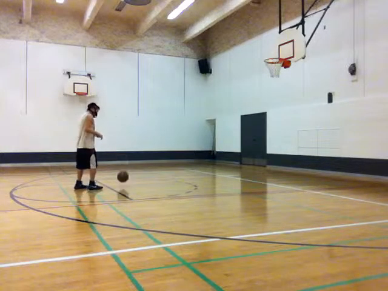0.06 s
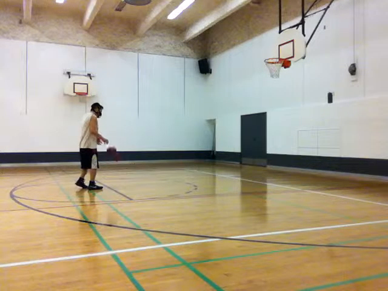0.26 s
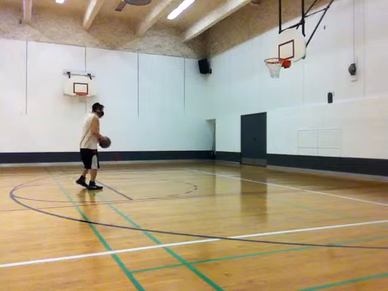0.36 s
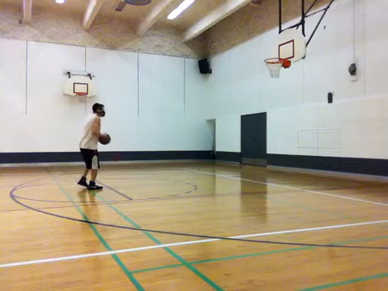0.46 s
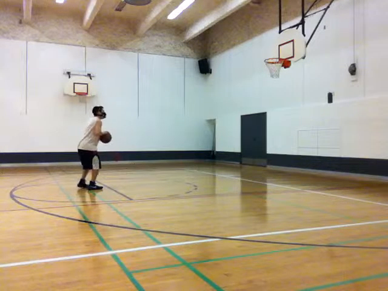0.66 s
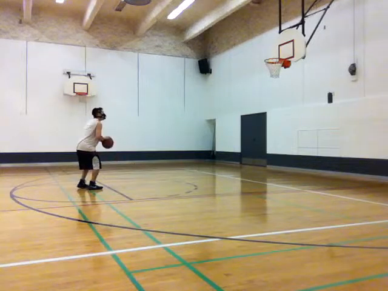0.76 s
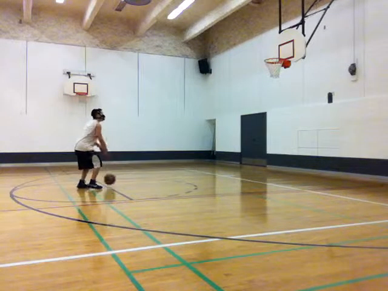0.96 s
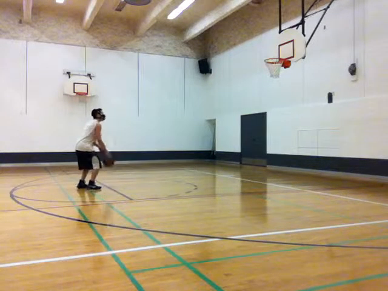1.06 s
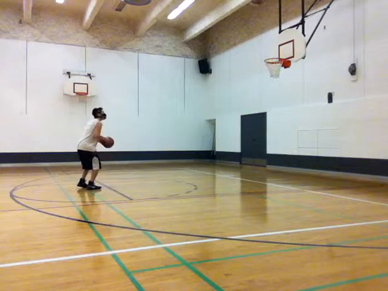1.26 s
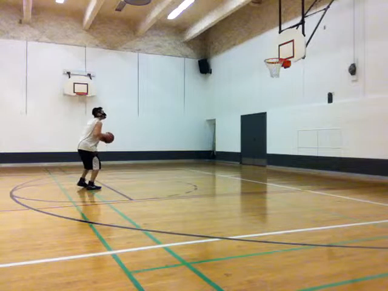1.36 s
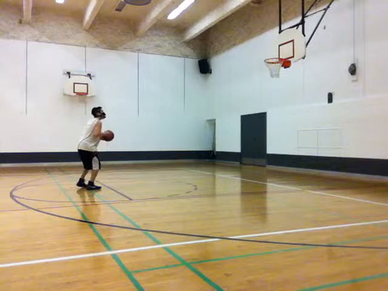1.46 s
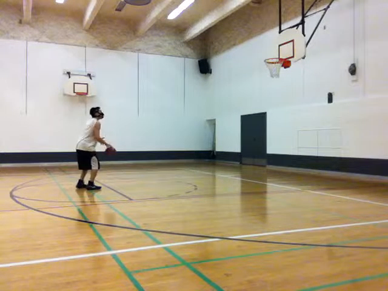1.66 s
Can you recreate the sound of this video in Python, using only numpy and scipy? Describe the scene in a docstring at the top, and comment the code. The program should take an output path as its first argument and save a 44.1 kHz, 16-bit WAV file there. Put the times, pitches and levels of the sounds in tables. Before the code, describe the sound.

Two basketball bounces, slap and hollow thump, ring out with long boomy reverberation in an empty gym

```python
"""A faint room tone, with a wavering hum, and the dying reverberation of earlier play fill a large gym.
At 0.25 s a basketball strikes the wooden floor: excited skin slaps, floor modes thump, enclosed air pings.
Delayed copies form the wall echoes; noise with frequency-dependent decay forms the long, boomy reverberation.
A faint swell of hiss, probably the rustle of hands and clothes, is centred on 0.69 s.
At 1.11 s the ball strikes again, at another spot, lower in pitch and with a weaker boom."""
import sys
import numpy as np
from scipy import signal
from scipy.fft import rfft, irfft, next_fast_len
from scipy.io import wavfile
from scipy.ndimage import uniform_filter1d, map_coordinates

SR = 44100
rng = np.random.default_rng(int(sys.argv[2]) if len(sys.argv) > 2 else 0)


def int16_out(signal):
    """Quantize to a 16-bit WAV file."""
    q = np.round(np.clip(np.atleast_2d(signal).T, -1, 1) * 32767)
    wavfile.write(sys.argv[1], SR, q.astype(np.int16))


N = 74970

# Room tone spectrum: f/Hz, level/dB per Hz
ROOM_SPECTRUM = [(25, -104), (60, -72), (130, -77.5), (300, -78.5), (600, -83), (1300, -102), (3000, -102),
                 (7800, -112), (9000, -106), (10300, -112), (18000, -113)]
HUM_HZ, HUM_WOBBLE_KNOTS_PER_S, HUM_DB = 208, 5.56, -49
# Reverberation of earlier play: f/Hz, starting level/dB per Hz
LINGERING_SPECTRUM = [(60, -98), (200, -66), (330, -112), (600, -87), (1400, -104), (1900, -93),
                      (2300, -102), (2900, -91), (3600, -104), (7000, -112), (9000, -101), (10500, -113),
                      (18000, -120)]
LINGERING_T60_S = 1.6
# Rustle spectrum, before its gain and swell: f/Hz, level/dB per Hz
RUSTLE_SPECTRUM = [(500, -125), (4000, -102), (7700, -101), (10000, -108), (12500, -105), (16000, -111)]
RUSTLE_CENTRE_S, RUSTLE_WIDTH_S, RUSTLE_GAIN_DB = 0.69, 0.29, 1

# Reverberation spectrum, before the boom of each bounce: f/Hz, starting level/dB per Hz
HALL_SPECTRUM = [(30, -87.5), (60, -74.5), (90, -58), (120, -50.5), (180, -43.5), (250, -42), (340, -48.5),
                 (480, -52), (700, -56.5), (900, -67), (1080, -67), (1230, -69.5), (1550, -66),
                 (1950, -75.5), (2800, -78), (3500, -79), (4700, -77.5), (7000, -83), (10000, -97),
                 (14000, -97), (19000, -112)]
# Reverberation time: f/Hz, t60/s
HALL_DECAY = [(60, 3.56), (120, 2.27), (220, 2.73), (400, 1.87), (1000, 2.7), (2500, 3.37), (4300, 2.73),
              (5500, 1.32), (8000, 1.19), (14000, 0.45)]
# Response of the reverberation to boom: f/Hz, share of the boom level/1
BOOM_RESPONSE = [(60, 0.4), (130, 0), (260, 0.61), (420, 0.51), (700, 0.63), (1000, -0.5), (1400, 0.9),
                 (2700, 0), (5000, 0.35), (10000, -0.62)]
HALL_BUILD_S, PING_WET_DB = 0.0014, -1.5
# Grain: level fluctuation above a limit, itself dying away with a time constant
GRAIN_ABOVE_HZ, HALL_GRAIN_DB, HALL_GRAIN_S = 1000, 4, 0.38
# Below that limit: smoothing time of the power, share of the swells removed
HALL_STEADY_S, HALL_STEADINESS = 0.056, 0.54
# Standing waves, before pitch ratio and boom: f/Hz, peak level/dB, time to peak t/s
ROOM_MODES = [(279.7, -16.5, 0.026), (247.4, -21.5, 0.085), (211, -22.5, 0.23)]
WAVE_WANDER_RAD, WAVE_WANDER_KNOTS_PER_S = 0.61, 13.6
WAVE_GROWTH = 1.46  # dB of standing wave for each dB of boom

# Colour of the small echoes: f/Hz, level/dB
SMALL_ECHO_FILTER = [(1000, -4.5), (4000, 3.5), (6000, -5), (9000, -21), (14000, -24)]
SMALL_ECHOES_PER_S, SMALL_ECHO_DB, SMALL_ECHO_T60_S = 58, -26.5, 3.7
# Colour of the near scatter: f/Hz, level/dB
SIZZLE_FILTER = [(1000, 9), (2200, -17), (4200, 6.5), (7000, -9.5), (12000, 1)]
SIZZLE_DB, SIZZLE_T60_S, SIZZLE_DELAY_S = -1, 0.021, 0.0031
# Later wall echoes: delay t/s, slap level/dB, thump level/dB
LATER_ECHOES = [(0.041, -26, -8), (.055, -8.5, -13), (0.06, -6, -10), (0.067, -10.5, -36),
                (.102, -25, -11.5), (.108, -13, -48), (.129, -23, -9.5), (.172, -22, -18.5),
                (.205, -13, -30), (0.21, -17.5, -13.5), (.239, -16, -30), (0.26, -34, -23),
                (0.27, -16, -19)]
# Reflection from the later walls: f/Hz, level/dB
WALL_FILTER = [(500, 4), (2000, -11), (3000, -3), (4500, 3), (6000, -7), (10000, -0.5), (16000, -16)]
# Reflection from the first wall: f/Hz, level/dB
FIRST_WALL_FILTER = [(500, 3), (2000, -14.5), (3600, 4.5), (5000, -10), (7000, 8.5), (8200, -3), (12000, 9),
                     (16000, 0)]
FIRST_WALL_SLAP_DB, FIRST_WALL_THUMP_DB, FIRST_WALL_THUMP_CUT_HZ = -4.5, -0.5, 155
ECHO_SMEAR_T60_S = 0.009
AIR_LOSS_DB_PER_S = 84  # at 10 kHz, growing as frequency squared
SCATTER_EVENNESS = 0.32  # share of a burst's chance colour that is flattened

# Modes of the air inside the ball, before the gain of each bounce: f/Hz, level/dB, t60/s
AIR_MODES = [(478.6, -33.5, 0.72), (849.5, -39, 0.26), (986, -43, 0.17), (1062, -37, 0.29),
             (1374, -36.5, 0.076), (1517, -37.5, 0.11), (1720, -55, 0.39), (1947, -41, 0.12),
             (2686, -33.5, 0.03), (2895, -49, 0.26), (3684, -36, 0.037)]
# Modes of ball and boards, before pitch ratio and gain:
# f/Hz, level at the first spot/dB, level at the second spot/dB, t60/s
FLOOR_MODES = [(127.5, -6.5, -12.5, 0.077), (197, 1.5, -5, 0.018), (287, 0, -8, 0.016),
               (388.4, -17.5, -19, 0.051), (484, -14.5, -22, 0.081), (601, -15.5, -19.5, 0.054),
               (799, -23, -28.5, 0.11), (948, -35, -31.5, 0.047), (1132, -25, -17.5, 0.019)]
MODE_RISE_CYCLES, THUMP_LOW_CUT_HZ = 0.17, 121
# Spectrum of the skin slap, before smack and gain: f/Hz, level/dB
SLAP_SPECTRUM = [(30, -41), (150, 1), (400, -6.5), (1000, 5.5), (1270, -3), (1650, 16), (2900, 10.5),
                 (3500, -2), (7000, 0.5), (9500, -5.5), (12000, -15), (18000, -19)]
# Response of the slap to smack: f/Hz, share of the smack level/1
SMACK_RESPONSE = [(700, -5.5), (1200, 3.7), (2300, 2.4), (3300, 0.5)]
# Pebbled skin flattening
CONTACT_DB, CONTACT_T60_S, CONTACT_LOW_CUT_HZ = -2.5, 0.004, 4730
# Bounces: t/s, slap level/dB, smack level/dB, thump level/dB, thump pitch ratio/1,
# ping level/dB, hall boom level/dB, delay of the first wall echo t/s
STRIKES = [(0.2467, 1, -1.5, -3.5, 0.99, -0.5, -2.5, .0261), (1.1130, 2, -1.5, 0, 0.91, 0.5, -10, .0272)]
TOP_HZ = 19000


def amp(db):
    """A level in decibels is twenty times the logarithm of the gain."""
    return 10 ** (np.asarray(db) / 20)


def along(points, hz):
    """Values are interpolated on a logarithmic frequency axis."""
    f, v = np.transpose(points)
    return np.interp(np.log(hz + 1), np.log(f + 1), v)


def fade(t, t60):
    """Exponential decay falls to a thousandth of its amplitude at t60."""
    return np.exp(-np.log(1000) * t / t60)


def wobble(rate):
    """Spline interpolation of random knots, rate per second, gives a smooth fluctuation."""
    return map_coordinates(rng.standard_normal(N), [np.arange(N) * rate / SR], order=3)


def coloured(x, curve):
    """Minimum-phase filtering: the folded cepstrum makes the gain curve(Hz) in dB causal."""
    m = 2 * next_fast_len(N)
    gain = amp(curve(np.fft.rfftfreq(m, 1 / SR)))
    cepstrum = irfft(np.log(gain), m)
    cepstrum[1:m // 2] *= 2
    cepstrum[m // 2 + 1:] = 0
    response = np.exp(rfft(cepstrum))
    return irfft(rfft(x, m) * response, m)[:N]


def white():
    """White noise has equal power in every hertz, here 0 dB per Hz."""
    return rng.standard_normal(N) * np.sqrt(SR / 2)


def convolved(a, b):
    """Linear superposition: a is played through the impulse response b."""
    return signal.fftconvolve(a, b)[:N]


def delayed(x, s):
    """Propagation delay: x starts s seconds later."""
    return np.pad(x, (max(round(s * SR), 0), 0))[:N]


def low_cut(x, hz):
    """A third-order high-pass filter attenuates what lies below hz."""
    return signal.sosfilt(signal.butter(3, hz, "highpass", fs=SR, output="sos"), x)


def scatter(t60):
    """Diffuse scattering: a decaying noise burst of unit energy and partly evened spectrum."""
    spectrum = rfft(rng.standard_normal(N) * fade(np.arange(N) / SR, t60))
    evening = (np.abs(spectrum) + 1e-9) ** np.clip(SCATTER_EVENNESS, 0, 1)
    burst = irfft(spectrum / evening, N)
    burst[N // 2:] = 0  # drop the part wrapped round from before the onset
    return burst / np.linalg.norm(burst)


def ring(modes, pitch=1):
    """Modal superposition: damped modes start together, alternating in sign; low ones rise more slowly."""
    t = np.arange(N) / SR
    total = np.zeros(N)
    for k, (hz, db, t60) in enumerate(modes):
        rise = 1 - np.exp(-t * hz / MODE_RISE_CYCLES)
        envelope = amp(db) * fade(t, t60) * rise
        total += (-1) ** k * envelope * np.sin(2 * np.pi * hz * pitch * t)
    return total


def room_tone():
    """Stationary noise gives rumble and hiss; a tone of random amplitude and phase gives the hum."""
    phase = 2 * np.pi * HUM_HZ * np.arange(N) / SR
    hum = wobble(HUM_WOBBLE_KNOTS_PER_S) * np.sin(phase)
    hum += wobble(HUM_WOBBLE_KNOTS_PER_S) * np.cos(phase)
    return coloured(white(), lambda hz: along(ROOM_SPECTRUM, hz)) + amp(HUM_DB) * hum


def lingering():
    """Reverberant decay: sound of earlier play dies away exponentially."""
    noise = coloured(white(), lambda hz: along(LINGERING_SPECTRUM, hz))
    return noise * fade(np.arange(N) / SR, LINGERING_T60_S)


def rustle():
    """Friction noise, probably of hands and clothes: hiss under a Gaussian swell."""
    t = np.arange(N) / SR
    swell = np.exp(-((t - RUSTLE_CENTRE_S) / RUSTLE_WIDTH_S) ** 2)
    hiss = coloured(white(), lambda hz: along(RUSTLE_SPECTRUM, hz))
    return amp(RUSTLE_GAIN_DB) * swell * hiss


def diffuse_noise():
    """Dense reflections behave as noise: steadied below the grain limit, grainy above it at first."""
    spectrum, hz = rfft(white()), np.fft.rfftfreq(N, 1 / SR)
    grain_fade = np.exp(-np.arange(N) / SR / HALL_GRAIN_S)
    grain = amp(HALL_GRAIN_DB * grain_fade * wobble(250))
    out = grain * irfft(spectrum * (hz >= GRAIN_ABOVE_HZ), N)
    window = max(round(HALL_STEADY_S * SR), 1)
    for lo, hi in [(0, 150), (150, 310), (310, GRAIN_ABOVE_HZ)]:
        band = irfft(spectrum * (hz >= lo) * (hz < hi), N)
        power = np.abs(uniform_filter1d(np.abs(signal.hilbert(band)) ** 2, window))
        out += band * (power.mean() / power) ** (np.clip(HALL_STEADINESS, 0, 1) / 2)
    return out


def hall_tail():
    """Reverberation builds up quickly, then each frequency decays with its own t60."""
    hz, s, z = signal.stft(diffuse_noise(), SR, nperseg=512)
    decayed = z * fade(s, along(HALL_DECAY, hz)[:, None])
    tail = signal.istft(decayed, SR, nperseg=512)[1][:N]
    return tail * (1 - np.exp(-np.arange(N) / SR / HALL_BUILD_S))


def standing_waves(pitch):
    """Room resonance: modes near the thump's pitch peak in turn, the lower later, so the boom sinks."""
    t = np.arange(N) / SR
    total = np.zeros(N)
    for hz, db, peak_s in ROOM_MODES:
        swell = (t / peak_s * np.exp(1 - t / peak_s)) ** 2
        wander = WAVE_WANDER_RAD * wobble(WAVE_WANDER_KNOTS_PER_S)
        total += amp(db) * swell * np.sin(2 * np.pi * hz * pitch * t + wander)
    return total


def small_echoes(slap):
    """Reflection from beams and backboards: random arrivals, fading in level, repeat the slap weakly."""
    t = np.arange(N) / SR
    arrivals = (rng.random(N) < SMALL_ECHOES_PER_S / SR) * rng.standard_normal(N)
    paths = amp(SMALL_ECHO_DB) * arrivals * fade(t, SMALL_ECHO_T60_S)
    return convolved(slap, coloured(paths, lambda hz: along(SMALL_ECHO_FILTER, hz)))


def sizzle(slap):
    """Scattering off the nearby floor and the player smears the slap just after the strike."""
    burst = delayed(scatter(SIZZLE_T60_S), SIZZLE_DELAY_S)
    spread = coloured(burst, lambda hz: along(SIZZLE_FILTER, hz))
    return amp(SIZZLE_DB) * convolved(slap, spread)


def wall_echo(slap, thump, colour, delay, slap_db, thump_db):
    """Reflection and air absorption: the thump and a smeared slap return, duller after a longer path."""
    def reflection(hz):
        """Wall colour less air absorption, in dB."""
        return along(colour, hz) - AIR_LOSS_DB_PER_S * delay * (hz / 10 ** 4) ** 2
    wall = coloured(scatter(ECHO_SMEAR_T60_S), reflection)
    return delayed(amp(slap_db) * convolved(slap, wall) + amp(thump_db) * thump, delay)


def wall_echoes(slap, thump, first_delay):
    """Superposition of reflections: every wall answers once, and the first swallows the bass."""
    first_thump = low_cut(thump, FIRST_WALL_THUMP_CUT_HZ)
    echoes = wall_echo(slap, first_thump, FIRST_WALL_FILTER, first_delay,
                       FIRST_WALL_SLAP_DB, FIRST_WALL_THUMP_DB)
    for delay, slap_db, thump_db in LATER_ECHOES:
        echoes = echoes + wall_echo(slap, thump, WALL_FILTER, delay, slap_db, thump_db)
    return echoes


def air_ping():
    """Cavity resonance: the air inside the ball rings in damped modes."""
    return ring(AIR_MODES)


def floor_thump(spot, pitch):
    """Modal excitation depends on the spot struck; ball and boards radiate little deep bass."""
    modes = [(hz, levels[spot], t60) for hz, *levels, t60 in FLOOR_MODES]
    return low_cut(ring(modes, pitch), THUMP_LOW_CUT_HZ)


def skin_slap(smack_db):
    """Impact excitation: an impulse and pebbly treble, fuller in the upper middle for a higher smack level."""
    pebbles = delayed(scatter(CONTACT_T60_S), CONTACT_T60_S / 20)
    click = amp(CONTACT_DB) * low_cut(pebbles, CONTACT_LOW_CUT_HZ)
    click[0] -= 1
    return coloured(click, lambda hz: along(SLAP_SPECTRUM, hz) + smack_db * along(SMACK_RESPONSE, hz))


def bounce(spot, slap_db, smack_db, thump_db, pitch, ping_db, boom_db, first_delay):
    """Direct sound, reflections and reverberation superpose; the boom level sets the hall's response."""
    slap = amp(slap_db) * skin_slap(smack_db)
    thump = amp(thump_db) * floor_thump(spot, pitch)
    ping = amp(ping_db) * air_ping()
    echoes = sizzle(slap) + wall_echoes(slap, thump, first_delay) + small_echoes(slap)
    reverb = coloured(hall_tail(), lambda hz: along(HALL_SPECTRUM, hz) + boom_db * along(BOOM_RESPONSE, hz))
    tail = hall_tail()
    ping_reverb = amp(PING_WET_DB) * convolved(ping, tail / np.linalg.norm(tail))
    waves = amp(WAVE_GROWTH * boom_db) * standing_waves(pitch)
    return slap + thump + ping + echoes + reverb + ping_reverb + waves


def scene():
    """Linear superposition of the background and the two bounces, in one channel."""
    mix = room_tone() + lingering() + rustle()
    for spot, (start_s, *settings) in enumerate(STRIKES):
        mix = mix + delayed(bounce(spot, *settings), start_s)
    return mix[None]


def record(dry):
    """Band limitation: the spectrum ends at TOP_HZ."""
    m = 2 * next_fast_len(N)
    passed = np.fft.rfftfreq(m, 1 / SR) < TOP_HZ
    return irfft(rfft(dry, m) * passed, m)[..., :N]


dry = scene()
out = record(dry)
int16_out(out)
```